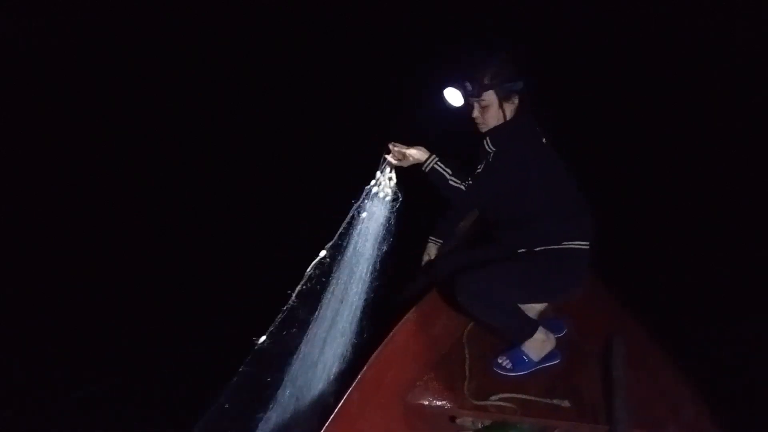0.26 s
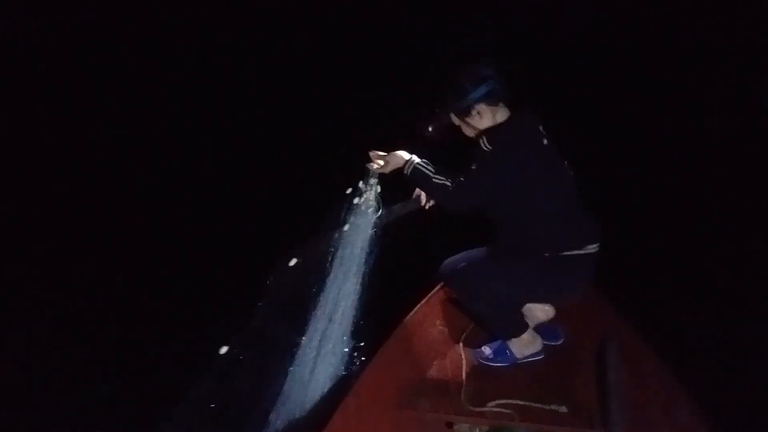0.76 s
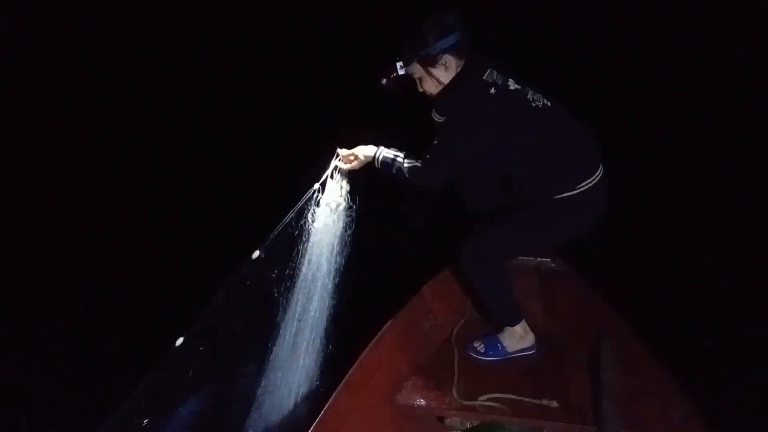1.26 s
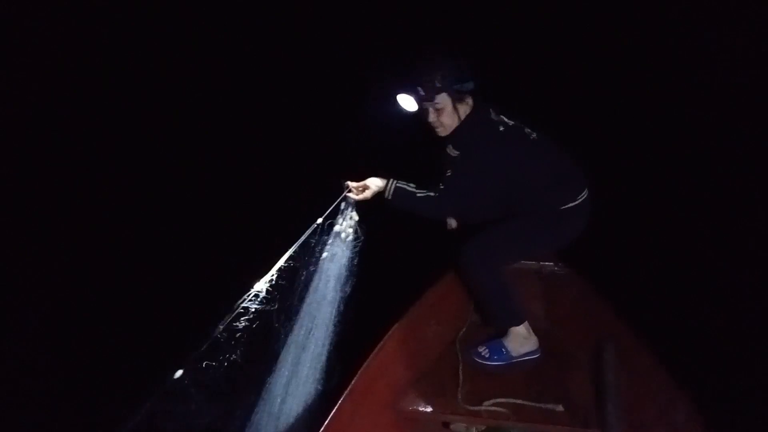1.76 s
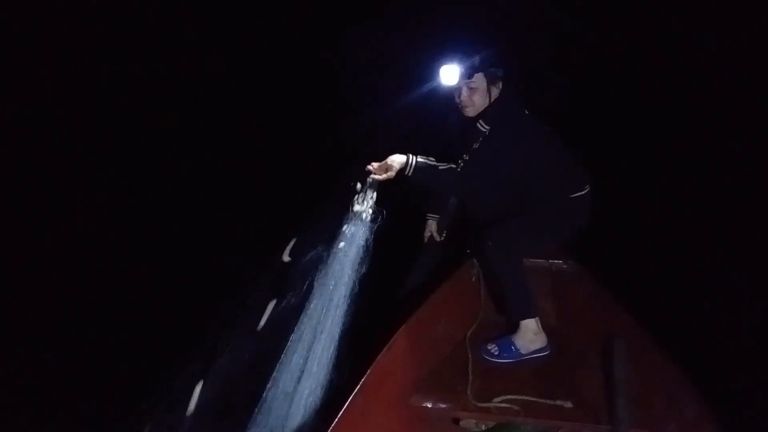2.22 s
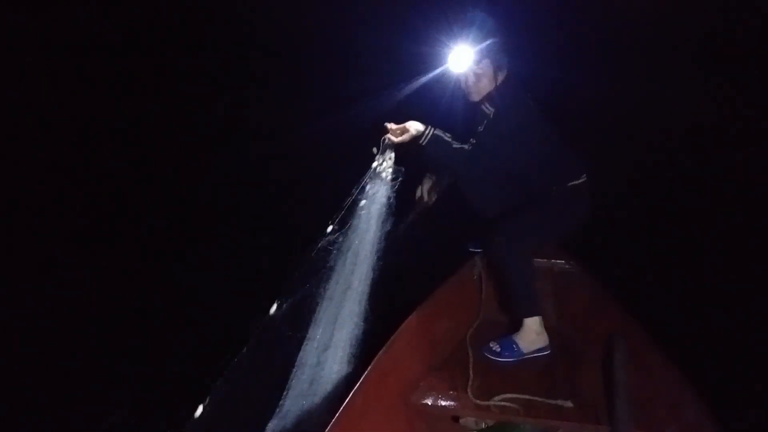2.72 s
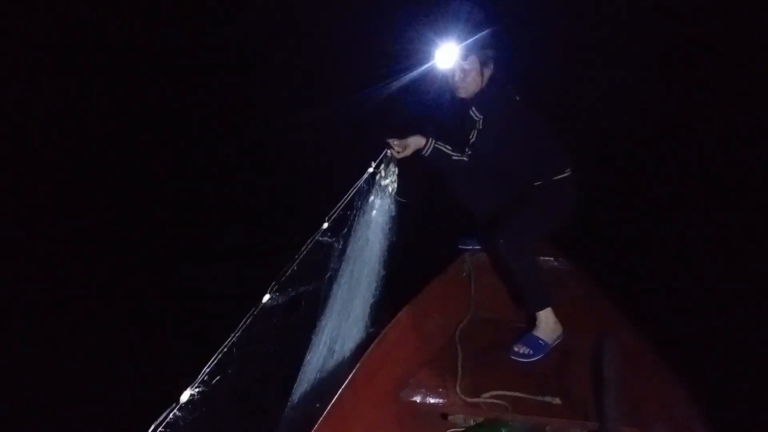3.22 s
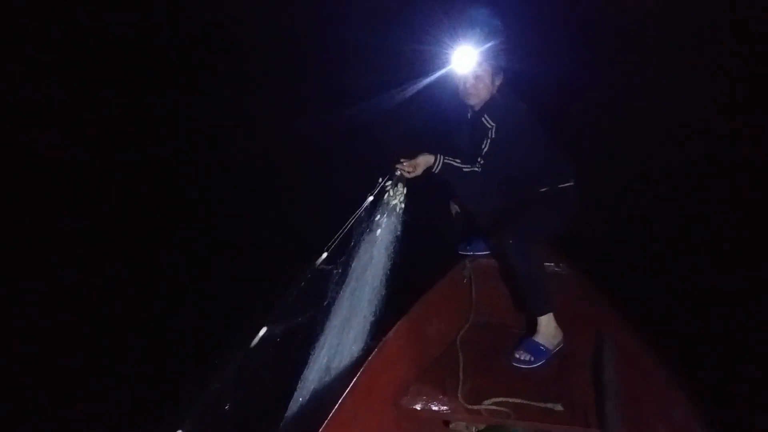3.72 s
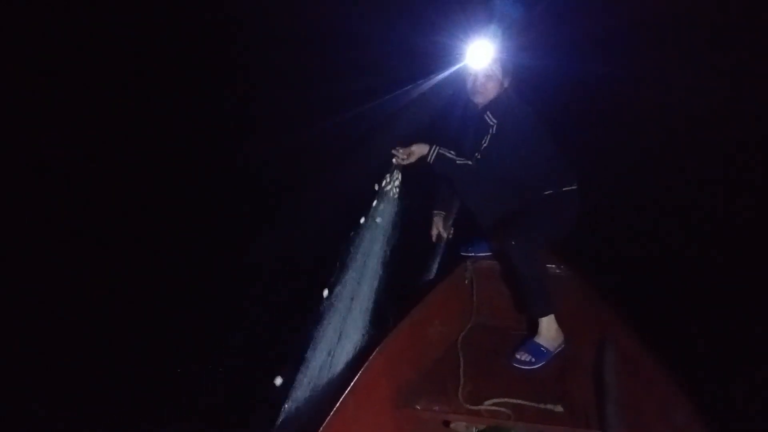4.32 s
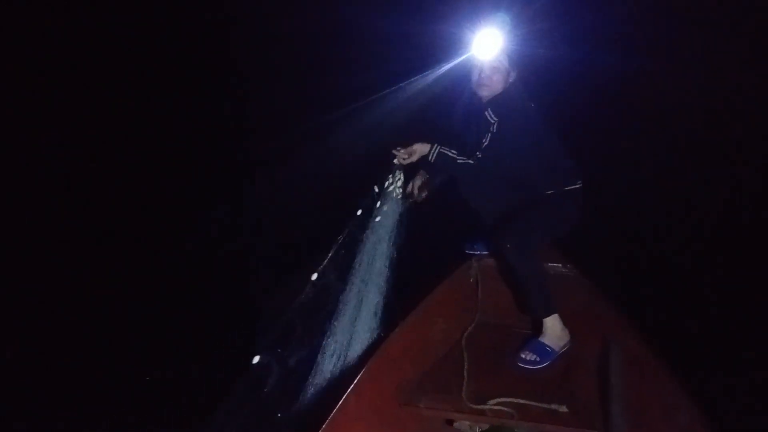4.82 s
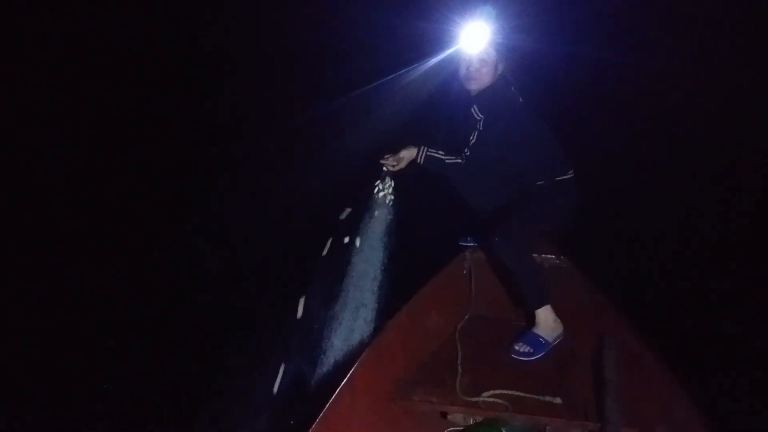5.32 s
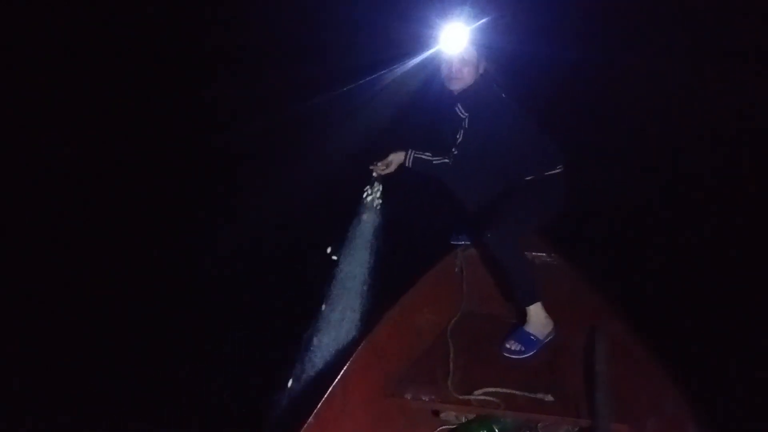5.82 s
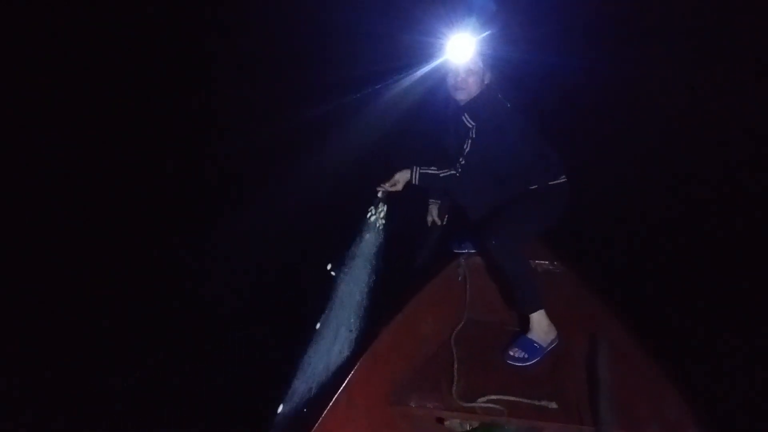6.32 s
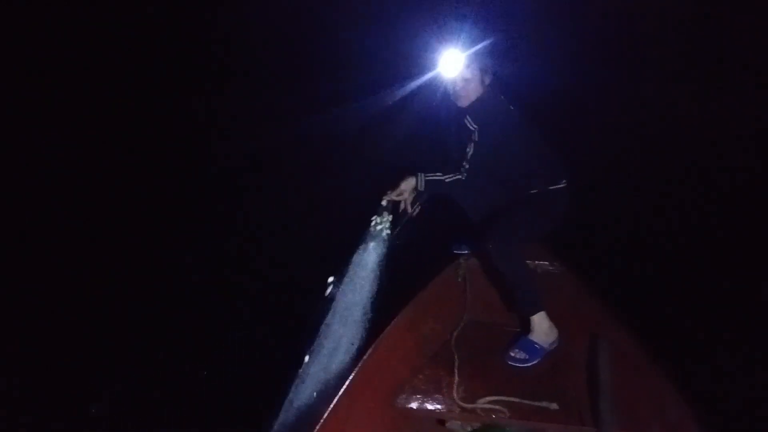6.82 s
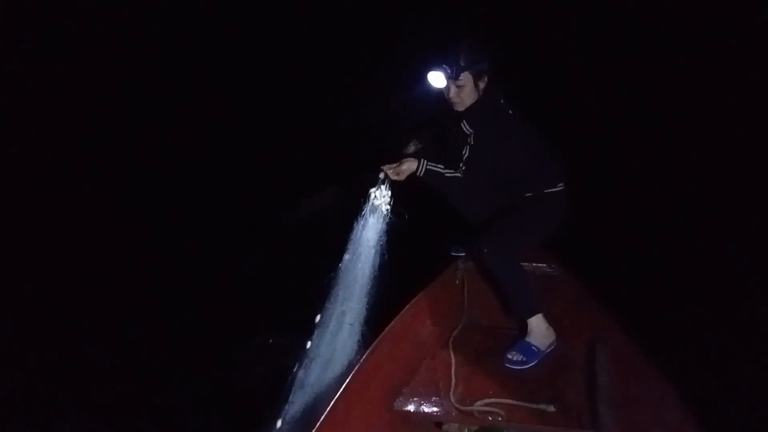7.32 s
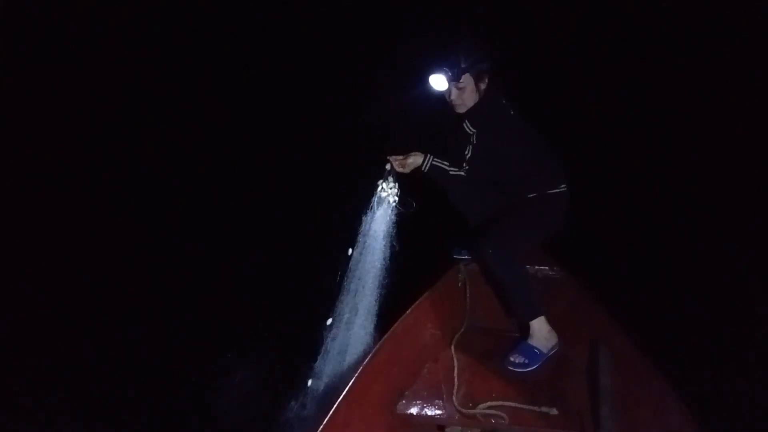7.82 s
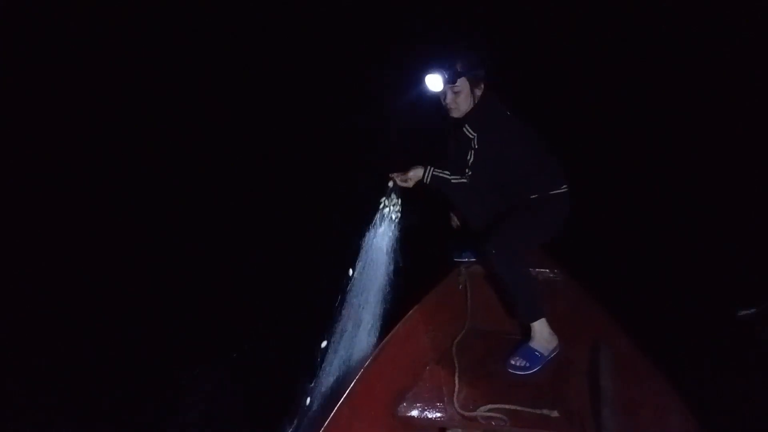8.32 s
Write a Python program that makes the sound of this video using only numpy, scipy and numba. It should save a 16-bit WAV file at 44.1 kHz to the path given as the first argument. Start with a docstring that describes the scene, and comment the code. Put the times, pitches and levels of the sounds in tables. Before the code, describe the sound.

Water splashes, drips and gurgles as a net is pulled aboard a wooden boat, over steady high night insects.

```python
"""Night on still water: a net is hauled hand over hand across the side of a small wooden boat.
A far chorus hisses, a mole cricket trills and a field cricket chirps throughout. From the first pull,
water gurgles along the hull and the mesh sprays, snaps and drips. Near 1.4 s wet net slaps down and
floats rattle; floats and feet knock the planks there and at 2.2 s. The biggest splash lands at 3 s.
Wet cord squeaks near 4 s, more knocks come at 5.5 s, and a faint low squeak leads into the last pull."""
import sys
import numpy as np
from scipy import signal
from scipy.fft import rfft, irfft, next_fast_len
from scipy.io import wavfile
from scipy.ndimage import uniform_filter1d
from numba import njit

SR = 44100
rng = np.random.default_rng(int(sys.argv[2]) if len(sys.argv) > 2 else 0)


def int16_out(signal):
    """Quantize to a 16-bit WAV file."""
    q = np.round(np.clip(np.atleast_2d(signal).T, -1, 1) * 32767)
    wavfile.write(sys.argv[1], SR, q.astype(np.int16))


N = 377496
T = np.arange(N) / SR
LUMPY_DB = 2.6  # level wobble of churning water
# Spray as the camera's microphone port colours it, ringing near 3 kHz and dull above 5 kHz:
# (frequency [Hz], relative level [dB])
SPRAY_AT_MIC = [(350, -42), (600, -25), (1040, -4.5), (1800, -11.5), (2530, 4.5), (3050, 9.5),
                (5580, -13.5), (7500, -46), (9750, -81), (16500, -120)]
# The finest droplets as heard at the microphone: (frequency [Hz], relative level [dB])
MIST_AT_MIC = [(3500, -34), (4500, -3.5), (6000, -0.5), (7800, -20.5), (8900, -14.5), (11400, -10),
               (15500, -23)]


def undb(db):
    """Decibels to gain."""
    return 10 ** (np.asarray(db) / 20)


def unit(x):
    """Scale to rms 1."""
    return x / np.sqrt(np.mean(x ** 2))


def colour(x, points):
    """EQ a sound through (Hz, dB) points; rms 1."""
    hz, db = np.transpose(points)
    size = next_fast_len(N)
    bins = np.arange(size // 2 + 1) * SR / size + 1
    gain = undb(np.interp(np.log(bins), np.log(hz), db))
    return unit(irfft(rfft(x, size) * gain, size)[:N])


def drift(rate):
    """Smooth random motion, rate steps a second, spread near 1."""
    k = int(SR / rate)
    steps = np.repeat(rng.standard_normal(N // k + 1), k)
    return 1.38 * uniform_filter1d(uniform_filter1d(steps, k), k)[:N]


@njit
def sweep(x, hz, q):
    """Band-pass with a moving centre, gain 1 there."""
    y, mid, low = np.empty(len(x)), 0., 0.
    for i in range(len(x)):
        g = np.tan(np.pi * hz[i] / SR)
        v = (mid + g * (x[i] - low)) / (1 + g * (g + 1 / q))
        mid, low, y[i] = 2 * v - mid, low + 2 * g * v, v / q
    return y


def band(x, hz, q, passes=1):
    """Steady band-pass; more passes steepen it."""
    for _ in range(passes):
        x = sweep(x, np.full(N, float(hz)), float(q))
    return x


@njit
def pings(at, hz, t60, gain, glide):
    """Fading sines whose pitch climbs by the share glide over their ring."""
    y = np.zeros(N)
    for k in range(len(at)):
        start, length, phase = int(at[k] * SR), int(t60[k] * SR), 0.
        for j in range(min(length, N - start)):
            phase += 2 * np.pi * hz[k] * (1 + glide[k] * j / length) / SR
            attack = min(1., j / (.13 * length))
            y[start + j] += gain[k] * np.sin(phase) * np.exp(-6.9 * j / length) * attack
    return y


def shower(count, lo_hz, hi_hz, cycles, spread_db, glide):
    """A cloud of ringing bubbles, a few louder than the rest."""
    when, pitch, ring, size = rng.random((count, 4)).T
    hz = lo_hz * (hi_hz / lo_hz) ** pitch
    gain = undb(-spread_db * np.log(1.03 - size))
    return unit(pings(when * N / SR, hz, cycles * (.5 + ring) / hz, gain, glide * ring))


def sizzle(rate, spread_db):
    """Noise roughened by droplet impacts, about rate a second."""
    hits = (rng.random(N) < rate / SR) * undb(np.minimum(spread_db * rng.exponential(size=N), 14))
    decays = signal.lfilter([1], [1, -np.exp(-1 / (0.0042 * SR))], hits)
    return unit(0.47 + decays) * rng.standard_normal(N)


def bursts(at, db, length, rise, tail_s):
    """Envelopes that swell over the share rise of their length, sink, and leave a short tail."""
    env = np.zeros(N)
    for start, gain, span in zip(at, undb(db), length):
        i = int(start * SR)
        t = T[:min(N - i, SR // 2)]
        swell = np.sin(np.pi / 2 * np.minimum(t / (rise * span), 1))
        sink = np.cos(1.408 * np.clip((t / span - rise) / (1 - rise), 0, 1))
        env[i:i + len(t)] += gain * swell * sink * np.exp(-np.maximum(t - span, 0) / tail_s)
    return env


def swells(at, hold, db, rest_db, rise_db_s, fall_db_s):
    """Gain that climbs to each event's level, holds, and sinks back to rest."""
    t = T[::SR // 200, None]
    peaks = undb(db - rise_db_s * np.maximum(at - t, 0) - fall_db_s * np.maximum(t - at - hold, 0))
    return np.interp(T, t[:, 0], np.sqrt(undb(rest_db) ** 2 + np.sum(peaks ** 2, axis=1)))


def planks(force):
    """A force rings the wooden hull's modes."""
    # (frequency [Hz], relative level [dB], t60 [s])
    modes = [(115, -17, 0.13), (198, 4, 0.025), (277, 7, 0.017), (405, -8, 0.093), (470, -14.5, 0.23),
             (1045, -14, 0.1)]
    out = 0
    for hz, db, t60 in modes:
        pole = np.exp(2j * np.pi * hz / SR - np.log(1000) / (t60 * SR))
        out += undb(db) * signal.lfilter([1], [1, -pole], force).imag
    return out


def night_bed():
    """Far chorus, lapping and air blend into one gently breathing noise."""
    # Tone of the bed: (frequency [Hz], relative level [dB])
    bed_eq = [(18, -46), (30, -8), (77, 1.5), (156, 1.5), (591, -7), (1510, -15.5), (1910, 6), (2300, -14),
              (2910, 4.5), (3320, 3.5), (4090, -7), (5040, -8.5), (7860, -39.5), (11300, -30.5),
              (15500, -56)]
    return undb(-57 + drift(3.08)) * colour(rng.standard_normal(N), bed_eq)


def mole_cricket():
    """A steady trill: each wing stroke is a short uneven burst near one pitch."""
    # Pace of the wings: (start [s], stroke rate [Hz])
    trill = [(0, 66.61), (2.8, 66.225), (5.6, 65.17), (6.2, 66.05), (7.8, 66.59)]
    at, rate = np.transpose(trill)
    pitch_hz, level_db = 1932, -62.5
    beat = .5 + np.cumsum(rate[np.searchsorted(at, T, side="right") - 1]) / SR
    stroke = (.5 + .5 * np.cos(2 * np.pi * beat)) ** 3.3
    index = np.round(beat).astype(int)
    detune, phase, accent = rng.standard_normal((index.max() + 1, 3))[index].T
    tone = np.sin(2 * np.pi * pitch_hz * (1 + 0.011 * detune) * T + 3 * phase) * undb(1.1 * accent)
    blur = unit(band(rng.standard_normal(N), pitch_hz, 4.6, passes=2))
    return undb(level_db + 0.69 * drift(2.24)) * unit(stroke * (tone + 0.16 * blur) + 0.15 * blur)


def field_cricket():
    """Chirps swell over their first wing strokes; every stroke slides down in pitch."""
    # Last stroke of each chirp: (time [s])
    chirp_ends = [.065, .51, .962, 1.389, 1.84, 2.264, 2.695, 3.109, 3.564, 3.976, 4.427, 4.881, 5.311,
                  5.774, 6.225, 6.663, 7.096, 7.561, 8.001, 8.459]
    pitch_hz, level_db, strokes, rate_hz = 3830, -49, 9, 41
    out = np.zeros(N)
    t = T[:int(.014 * SR)]
    stroke = np.sin(np.pi * (t / t[-1]) ** 0.59) ** 0.35
    for end in chirp_ends:
        for k, (detune, accent, phase) in enumerate(rng.standard_normal((strokes, 3))):
            i = int((end - .005 - (strokes - 1 - k) / rate_hz) * SR)
            hz = pitch_hz * (1 + 0.0066 * detune) * (1 - 11 * t)
            gain = undb(level_db - 3.6 * max(3 - k, 0) + accent)
            if i >= 0:
                out[i:i + len(t)] += gain * stroke * np.sin(2 * np.pi * np.cumsum(hz) / SR + 3 * phase)
    # reeds and banks send it back, smeared
    echo = rng.standard_normal(SR // 4) * np.exp(-T[:SR // 4] / 0.073)
    return out + undb(-8) * signal.fftconvolve(out, echo / np.linalg.norm(echo))[:N]


def hull_gurgle():
    """Trapped air gurgles at a gliding pitch as water sloshes against the hull."""
    # (peak time [s], hold [s], level [dB], first pitch [Hz], last pitch [Hz])
    sloshes = [(0.603, 0.051, -51, 338, 135.5), (1.436, 0.021, -41.5, 213, 137),
               (1.896, 0.015, -50, 346, 268), (2.32, 0.15, -61.5, 210, 240), (2.877, 0.073, -49, 282, 309),
               (3.029, 0.015, -48, 357, 112), (3.437, 0.016, -58, 322, 253), (3.693, 0.38, -49.5, 230, 335),
               (4.245, 0.082, -56, 398, 410), (5.504, 0.0083, -58.5, 316, 350),
               (5.821, 0.27, -52.5, 257, 284), (6.107, 0.14, -56.5, 171, 152),
               (8.048, 0.29, -52.5, 299, 185)]
    at, hold, db, first_hz, last_hz = np.transpose(sloshes)
    glide_end = np.minimum(at + hold + 0.1424, np.append(at[1:], N / SR) - .04)
    hz = np.interp(T, np.ravel([at, glide_end], order="F"), np.ravel([first_hz, last_hz], order="F"))
    churn = rng.standard_normal(N) * undb(LUMPY_DB * drift(22))
    count = 500
    detune, ring, accent = rng.standard_normal((count, 3)).T
    plop_at = rng.random(count) * N / SR
    plop_hz = np.interp(plop_at, T, hz) * np.exp(0.1956 * detune)
    t60 = 18 * np.exp(0.27 * ring) / plop_hz
    plops = unit(pings(plop_at, plop_hz, t60, undb(5.3 * accent), np.full(count, 0.32)))
    wobble_hz = hz * (1 + 0.087 * drift(15))
    hollow = unit(sweep(sweep(churn, wobble_hz, 6.8), wobble_hz, 6.8))
    wash = unit(band(band(churn, 330, 1), 322, 1))
    env = swells(at, hold, db, rest_db=-75.5, rise_db_s=313, fall_db_s=83)
    return env * (0.99 * plops + 0.39 * hollow + 0.52 * wash)


def hull_thuds():
    """The boat rocks and wavelets thud under it."""
    # (peak time [s], hold [s], level [dB])
    rockings = [(1.454, 0.062, -47.5), (3.036, 0.06, -56.5), (6.68, .02, -64), (7.037, 0.71, -66.5)]
    thud = undb(LUMPY_DB * drift(9.2)) * band(rng.standard_normal(N), 116, 1.6, passes=2)
    return swells(*np.transpose(rockings), rest_db=-78.5, rise_db_s=250, fall_db_s=37) * unit(thud)


def cord_squeaks():
    """Wet cord rubs on wood in thin wavering tones."""
    # One path per squeak: (time [s], pitch [Hz], level [dB])
    paths = [
        [(3.775, 2480, -57), (3.82, 2786, -41), (3.87, 2927, -40.5), (3.97, 2880, -35.5), (4.015, 2800, -37.5),
         (4.035, 2650, -51), (4.095, 2480, -53)],
        [(7.4, 783, -59), (7.42, 890, -58), (7.48, 843, -51), (7.53, 718, -58.5), (7.58, 670, -74)],
    ]
    out = 0
    for path in paths:
        at, hz, db = np.transpose(path)
        fade = np.clip(np.minimum(T - at[0], at[-1] - T) / 0.015, 0, 1)
        phase = 2 * np.pi * np.cumsum(np.interp(T, at, hz) * (1 + 0.0038 * drift(170))) / SR
        out += fade * undb(np.interp(T, at, db) + 2.2 * drift(160)) * np.sin(phase)
    return out


def float_rattles():
    """Hollow floats jostle, rung by dense small blows."""
    # (time [s], level [dB], length [s])
    rattles = [(1.362, -38, 0.041), (1.411, -40, 0.017), (1.443, -42, 0.02)]
    # Float resonances: (frequency [Hz], width [Hz], relative level [dB])
    modes = [(1820, 63, -5), (2445, 31, -5), (3020, 39, 3.5), (3250, 33, -4), (3580, 32, -6)]
    blows = rng.standard_normal(N)
    ring = sum(undb(db) * unit(band(blows, hz, hz / width)) for hz, width, db in modes)
    return bursts(*np.transpose(rattles), rise=0.28, tail_s=.008) * unit(ring)


def plank_knocks():
    """Feet and floats ring the planks with a rounded push; hard floats add a click."""
    # (time [s], relative push [dB], relative click [dB], contact [s])
    blows = [(1.415, -19, -45, 0.0014), (2.1906, -26, -2.5, 0.0021), (2.982, -41, -45, 0.002),
             (5.428, -43.5, -18.5, 0.00082), (5.487, -22, 1.5, 0.0015)]
    force, impulses = np.zeros(N), np.zeros(N)
    for at, db, click_db, contact in blows:
        i, push = int(at * SR), np.hanning(max(int(contact * SR), 4))
        force[i:i + len(push)] += undb(db) * push / push.sum()
        impulses[i] -= undb(click_db)
    body = band(planks(force), 230, 0.33, passes=2)
    click = band(band(impulses, 3020, 1.7), 690, 0.54, passes=2)
    return 0.61 * body + 5 * click


def air_bubbles():
    """Large bubbles rise in pitch as they near the surface."""
    # (time [s], level [dB], first pitch [Hz], rise over the ring [share])
    bubbles = [(0.371, -46, 1063, 0.79), (0.478, -44, 1070, 0.73), (1.744, -38, 815, 1.2),
               (1.893, -35.5, 817, 1.3), (1.966, -42, 696, 0.85), (2.148, -41.5, 700, 1.7),
               (2.366, -38.5, 870, 1.75), (3.487, -45.5, 773, 0.96), (4.157, -39.5, 786, 0.4),
               (4.215, -39, 837, 1.2), (4.922, -46, 664, 0.58), (4.964, -44.5, 622, 0.94),
               (5.05, -41.5, 1020, 0.76), (6.928, -43.5, 763, 0.68), (7.964, -39, 603, .7),
               (8.526, -42.5, 770, 0.83)]
    at, db, hz, rise = np.transpose(bubbles)
    return pings(at, hz, t60=np.full_like(at, 0.086), gain=undb(db), glide=rise)


def net_drips():
    """Drops fall from the mesh, each a brief high plink."""
    # (time [s], level [dB], pitch [Hz])
    drips = [(0.711, -34, 3840), (0.739, -34, 3630), (1.5523, -33.5, 3330), (1.641, -34, 2140),
             (1.833, -32, 1770), (2.3362, -20, 3280), (2.4254, -31.5, 2620), (2.545, -32, 2860),
             (2.6923, -24.5, 2700), (2.935, -16, 3190), (3.435, -27, 3800), (3.696, -23.5, 2500),
             (4.7063, -30.5, 2650), (4.755, -24.5, 3140), (4.87, -38, 2710), (4.9285, -35, 2760),
             (4.99, -33, 2860), (5.8254, -28, 2930), (5.9433, -18.5, 2870), (6.4034, -29, 3090),
             (7.183, -30, 3060), (7.217, -27.5, 3340), (7.8472, -32, 2840), (7.9099, -25, 1880),
             (8.0431, -42, 2890), (8.0835, -24.5, 2740)]
    at, db, hz = np.transpose(drips)
    return pings(at, hz, t60=32.7 / hz, gain=undb(db), glide=np.full_like(at, 0.012))


def mesh_snaps():
    """The mesh snaps: two bright, very short partials with a spit of air on top."""
    # (time [s], relative level [dB], nominal pitch [Hz], spit level [dB])
    snaps = [(0.0952, -37.5, 5340, -79), (0.2538, -41.5, 5400, -67), (0.7232, -35, 4460, -64),
             (1.1236, -29, 4200, -51), (1.367, -42, 5070, -49), (1.4902, -39, 5440, -50),
             (1.6768, -41, 6100, -67), (1.7482, -38, 5880, -64), (1.9764, -49, 4360, -48),
             (2.3178, -53, 4260, -51.5), (2.9835, -24, 4300, -54), (3.2123, -58, 7560, -55.5),
             (3.3445, -48, 6200, -78), (3.475, -44, 5500, -67), (3.493, -43, 5400, -68),
             (3.5314, -41, 5110, -75), (3.56, -35.5, 6060, -73), (3.5987, -40.5, 5570, -71),
             (3.943, -26.5, 4000, -50), (4.1046, -49, 6000, -70), (4.606, -46.5, 6660, -77),
             (4.7638, -33.5, 6000, -56), (5.007, -40.5, 5270, -55), (5.123, -36.5, 4940, -59),
             (5.348, -44, 4380, -51), (5.3783, -38.5, 4060, -56), (5.4868, -58, 5000, -63),
             (5.8726, -35.5, 5460, -74), (5.9359, -36, 5270, -69), (6.0162, -38, 5200, -68),
             (6.0785, -35, 5350, -79), (6.4395, -37.5, 4890, -83)]
    at, db, hz, spit_db = np.transpose(snaps)
    t60, glide = np.full_like(at, 0.0038), np.zeros_like(at)
    snap = sum(pings(at, hz * ratio, t60, undb(db + trim_db), glide)
               for ratio, trim_db in ((0.98, 6), (0.55, -3)))
    noise = rng.standard_normal(N)
    spit = unit(band(noise, 7400, 1.2) + 2.1 * band(noise, 11300, 6.9))
    return snap + bursts(at, spit_db, np.full_like(at, 0.0029), rise=0.2, tail_s=0.0024) * spit


def net_slaps():
    """Bunches of wet net slap down, burst into spray and mist, and shake the planks."""
    # (time [s], spray level [dB], hull level [dB], mist level [dB], length [s])
    slaps = [(0.557, -43, -42, -59, 0.044), (0.707, -58, -81, -69, 0.055),
             (1.1078, -45.5, -45.5, -54.5, 0.04), (1.355, -39.5, -33, -55, 0.061),
             (1.404, -47.5, -45, -66, 0.076), (1.485, -53, -66, -53, 0.024), (1.77, -46, -74, -67, 0.033),
             (1.911, -52.5, -44, -77, 0.028), (2.793, -49.5, -75, -69, 0.021),
             (2.839, -39, -74, -58.5, 0.1), (2.921, -36, -60, -56, 0.054),
             (2.966, -34.5, -38, -50.5, 0.079), (2.9925, -32.5, -43.5, -50, 0.044),
             (3.436, -52, -58, -66, 0.029), (3.555, -45.5, -57, -70, 0.031), (3.686, -45, -60, -71, 0.037),
             (4.739, -46.5, -67, -72, 0.039), (5.517, -42, -46.5, -80, 0.053), (5.841, -49, -74, -67, 0.11),
             (5.933, -41, -51.5, -70, 0.049), (6.927, -52, -64.5, -99, 0.11),
             (8.065, -50.5, -80, -66, 0.061)]
    at, spray_db, hull_db, mist_db, length = np.transpose(slaps)
    splash = sizzle(3000, spread_db=0.98)
    mist = unit(band(colour(splash, MIST_AT_MIC), 7000, 0.79))
    shake = unit(band(planks(np.diff(rng.standard_normal(N + 1))), 263, 0.69))
    return (bursts(at, spray_db, length, rise=0.3, tail_s=0.016) * colour(splash, SPRAY_AT_MIC)
            + bursts(at, mist_db, 0.89 * length, rise=0.39, tail_s=0.0093) * mist
            + bursts(at, hull_db, length, rise=0.13, tail_s=0.097) * shake)


def net_haul():
    """Each pull stirs up bubbles and spray; the finest droplets crackle above in clusters."""
    # (peak time [s], hold [s], spray level [dB], bubbling level [dB])
    pulls = [(0.13, 0.027, -63.5, -61.5), (0.627, 0.043, -62, -75), (1.626, 0.7, -61.5, -61.5),
             (3.526, 0.071, -76, -62.5), (3.775, 0.4, -54.5, -54), (4.77, 0.14, -56, -64.5),
             (5.906, 0.16, -54.5, -56), (6.28, 0.088, -59.5, -59), (6.927, 0.061, -58.5, -67.5),
             (8.07, 0.11, -53, -56)]
    at, hold, spray_db, bubbling_db = np.transpose(pulls)
    spray_env = swells(at, hold, spray_db, rest_db=-68.5, rise_db_s=73, fall_db_s=40)
    bubbling_env = swells(at + 0.015, hold, bubbling_db, rest_db=-77.5, rise_db_s=98, fall_db_s=26)
    bubbles = shower(count=2000, lo_hz=760, hi_hz=1420, cycles=26, spread_db=4.1, glide=0.5)
    lumps = undb(LUMPY_DB * drift(14))
    froth = unit(band(rng.standard_normal(N), 1100, 1.4, passes=2))
    bubbling = unit(lumps * (bubbles + 0.48 * froth))
    droplets = shower(count=3000, lo_hz=1980, hi_hz=3720, cycles=12.4, spread_db=3.5, glide=0.046)
    spray = 0.52 * droplets + 1.4 * colour(sizzle(180, spread_db=5.8), SPRAY_AT_MIC)
    beads = shower(count=900, lo_hz=4350, hi_hz=14400, cycles=16, spread_db=5.5, glide=0.12)
    crackle = 0.59 * unit(sizzle(40, spread_db=3.8)) + 0.44 * beads
    mist = colour(crackle * undb(3.1 * drift(9)), MIST_AT_MIC)
    return bubbling_env * bubbling + spray_env * spray + spray_env ** 0.61 * undb(-33.5) * mist


def scene():
    """Boat and net in front, insects behind, in mono."""
    boat = hull_gurgle() + hull_thuds() + net_haul() + net_slaps() + float_rattles()
    details = mesh_snaps() + net_drips() + air_bubbles() + plank_knocks() + cord_squeaks()
    return (boat + details + mole_cricket() + field_cricket() + night_bed())[None, :]


def record(dry):
    """A small camera drops the deep bass and cuts the top."""
    low_cut = signal.butter(3, 55, "high", fs=SR, output="sos")
    high_cut = signal.ellip(10, .2, 60, 15700, fs=SR, output="sos")
    return signal.sosfilt(high_cut, signal.sosfilt(low_cut, dry))


dry = scene()
out = record(dry)
int16_out(out)
```